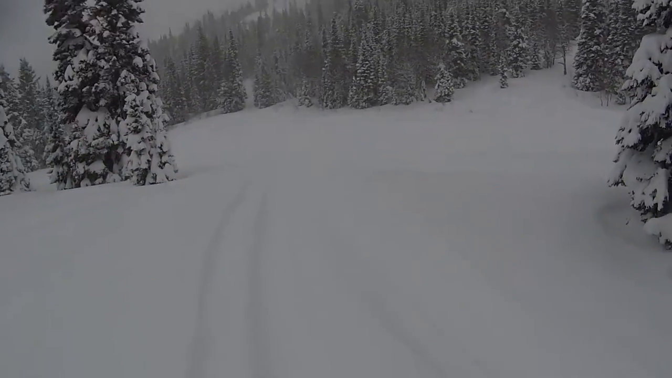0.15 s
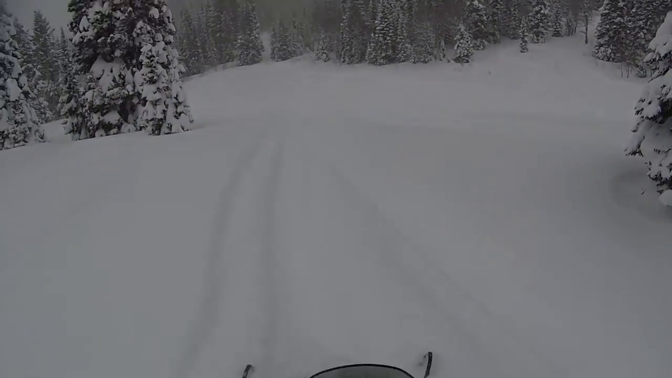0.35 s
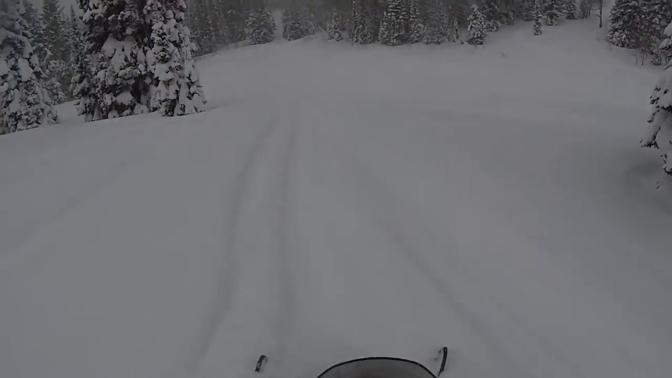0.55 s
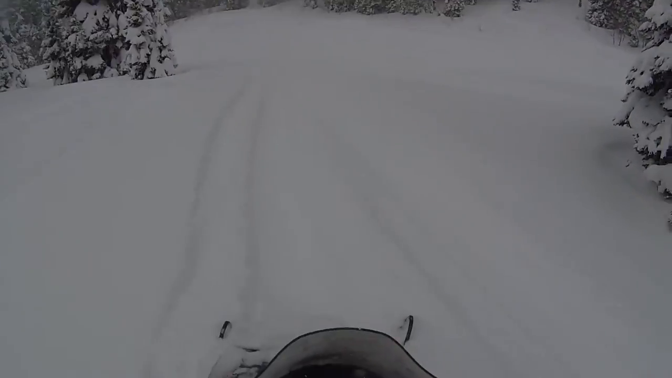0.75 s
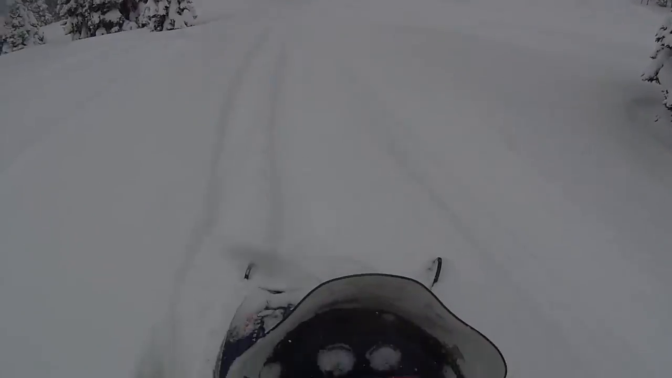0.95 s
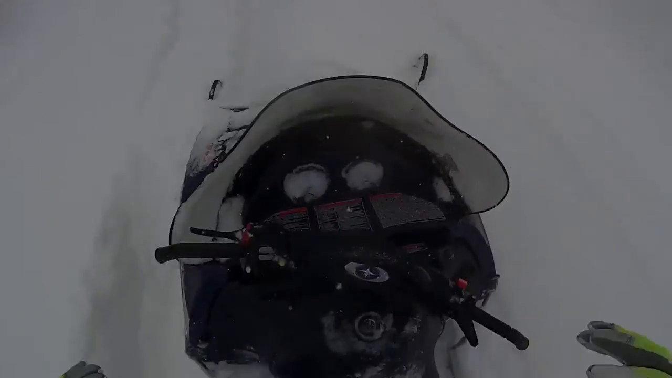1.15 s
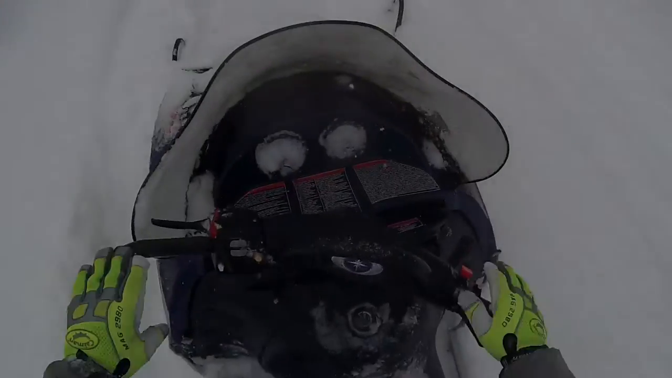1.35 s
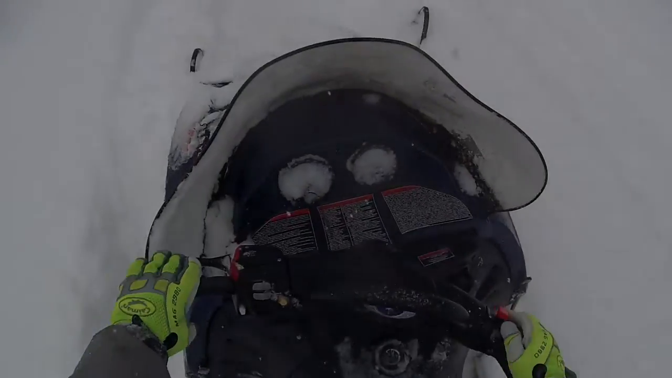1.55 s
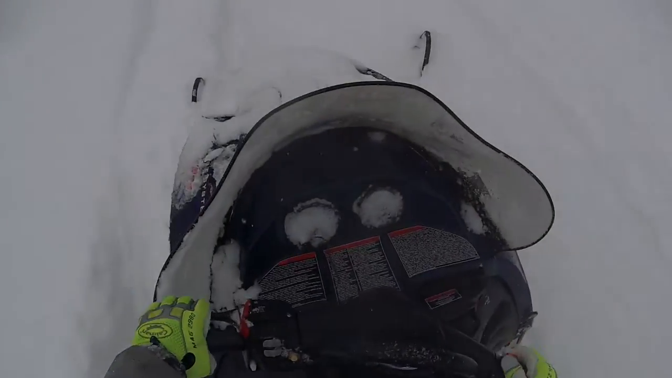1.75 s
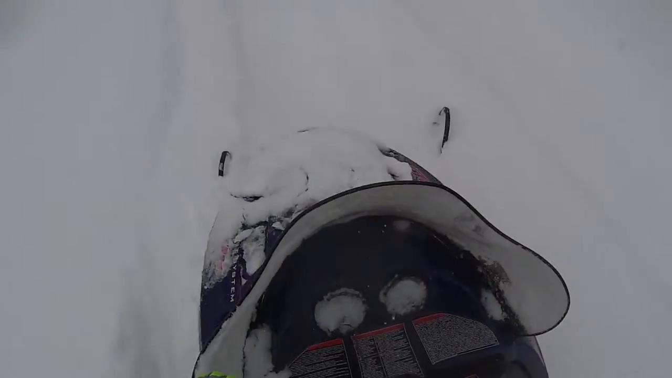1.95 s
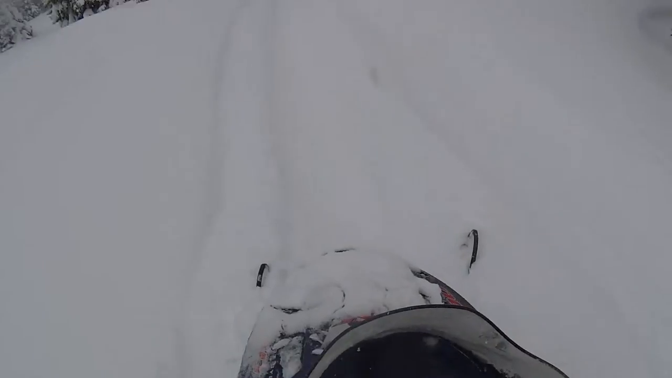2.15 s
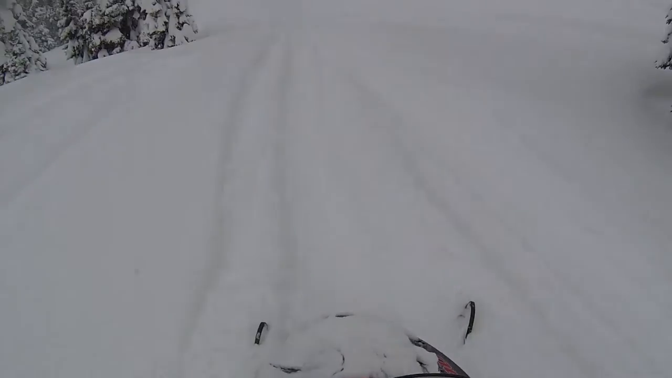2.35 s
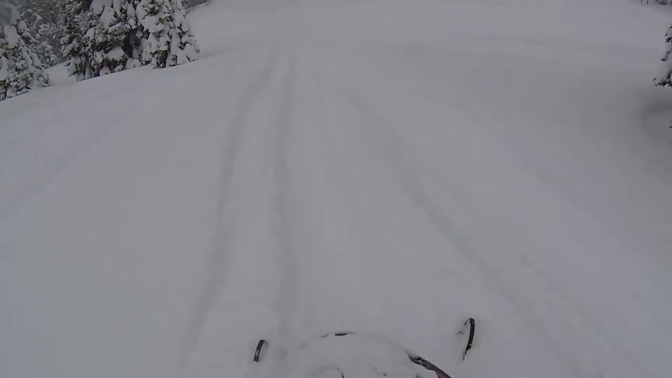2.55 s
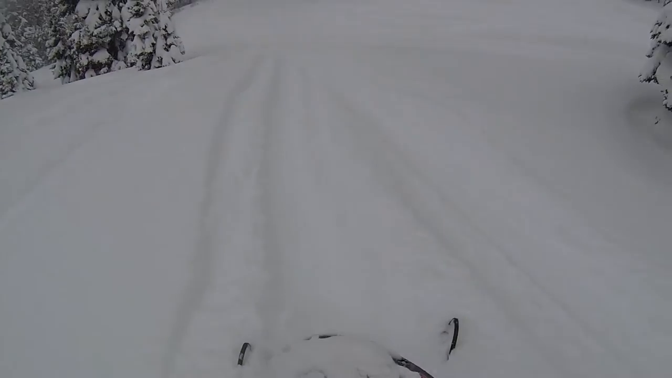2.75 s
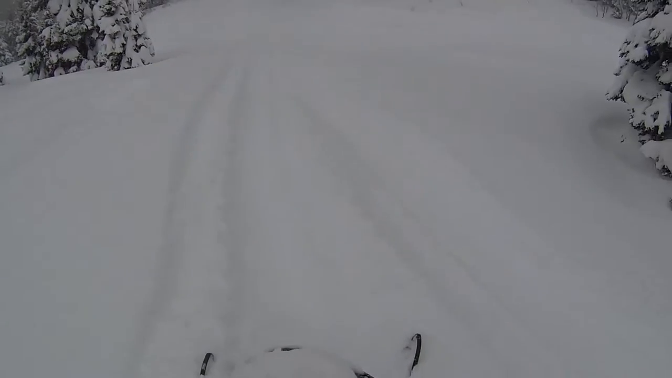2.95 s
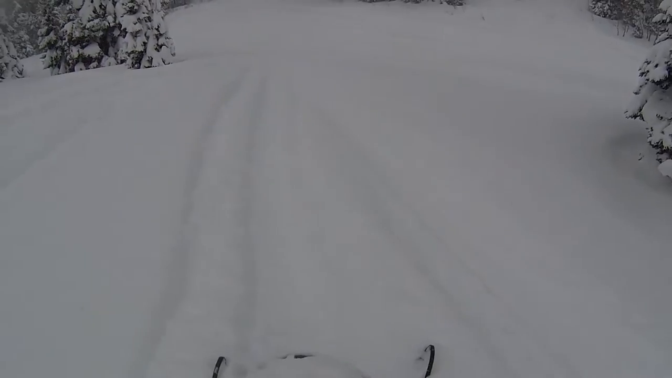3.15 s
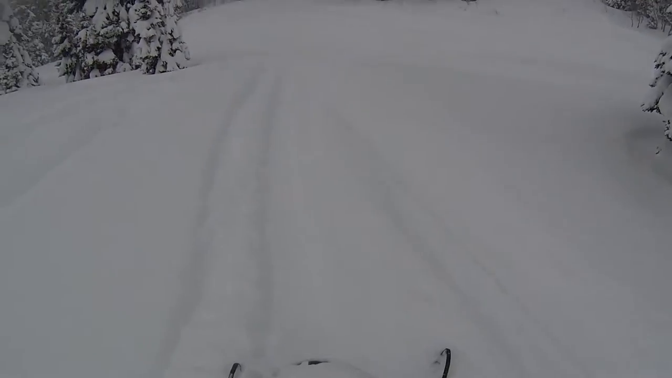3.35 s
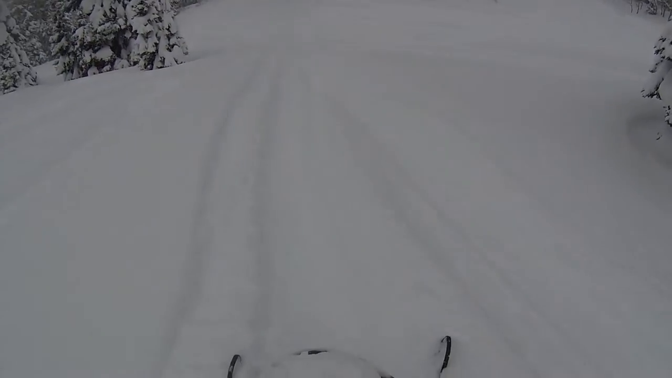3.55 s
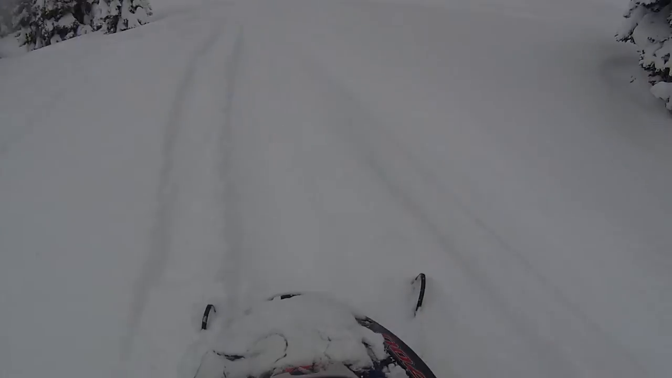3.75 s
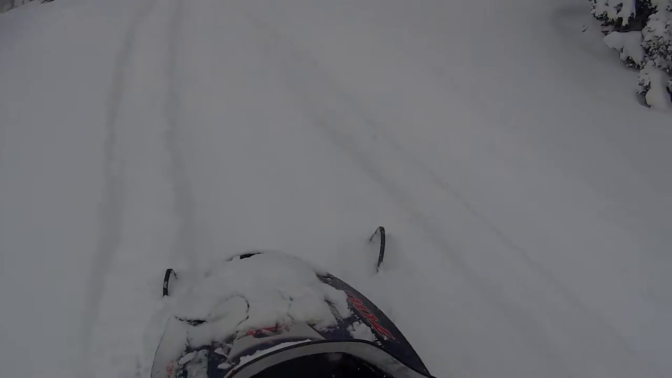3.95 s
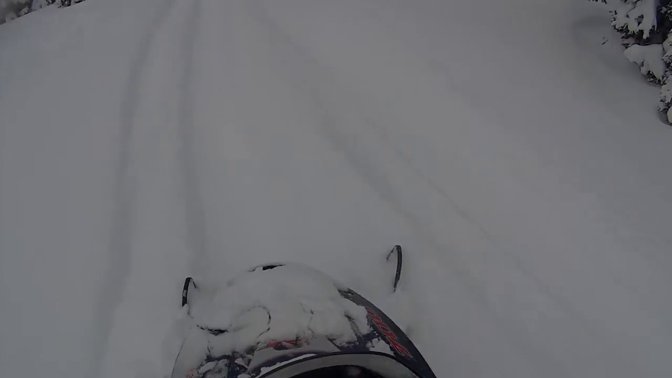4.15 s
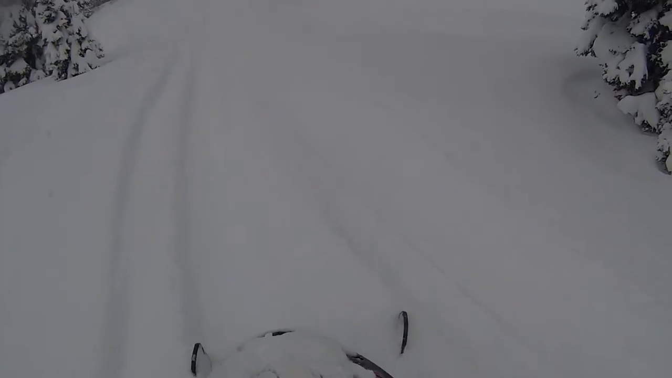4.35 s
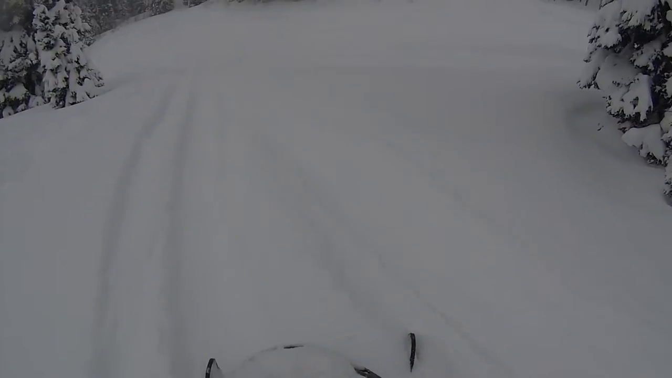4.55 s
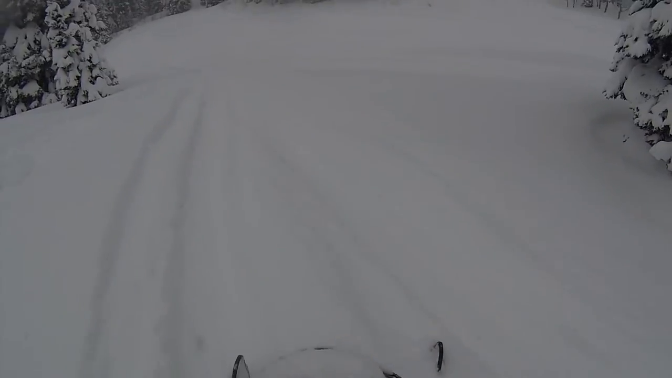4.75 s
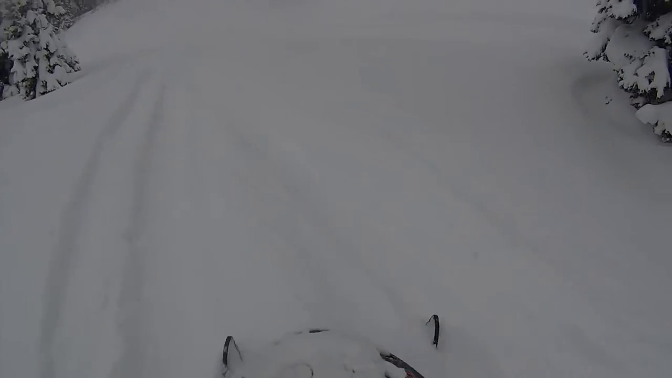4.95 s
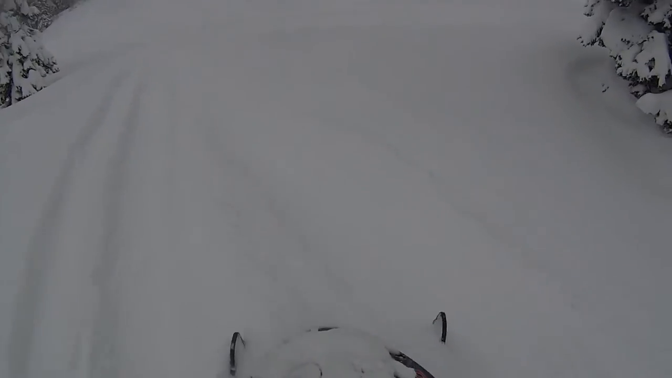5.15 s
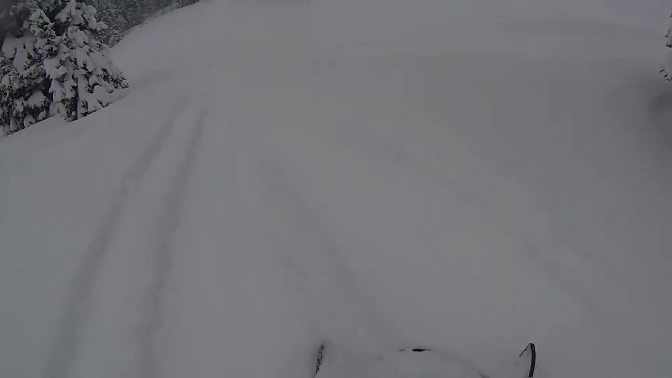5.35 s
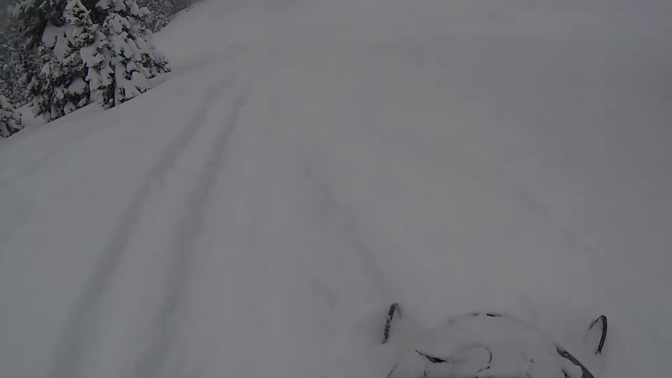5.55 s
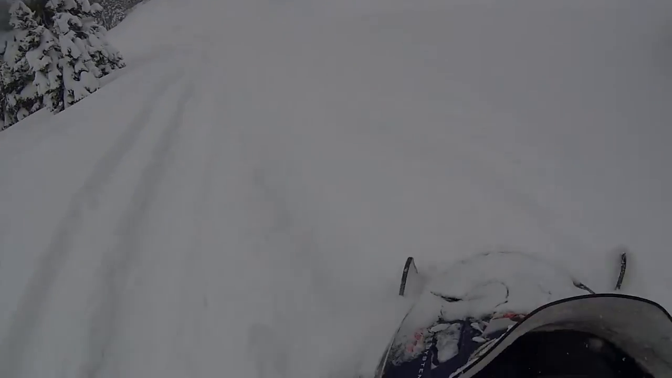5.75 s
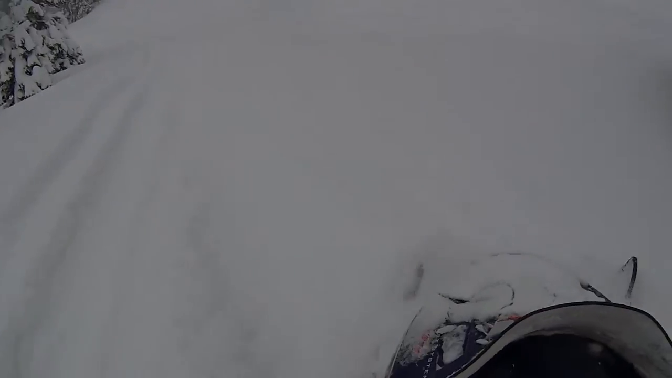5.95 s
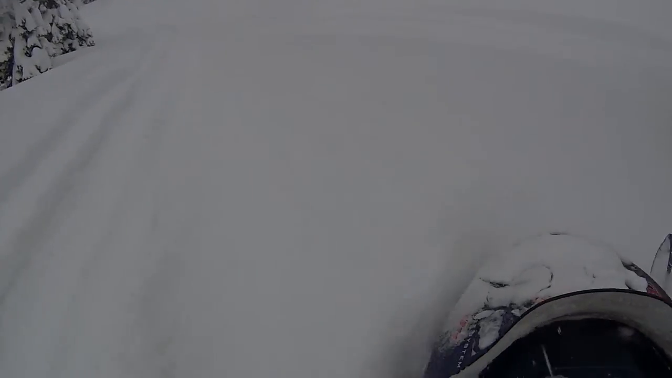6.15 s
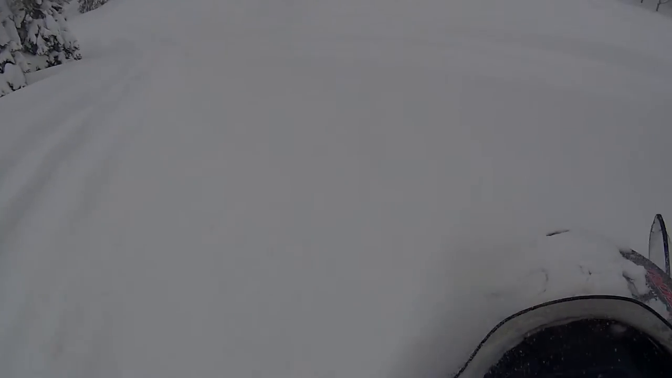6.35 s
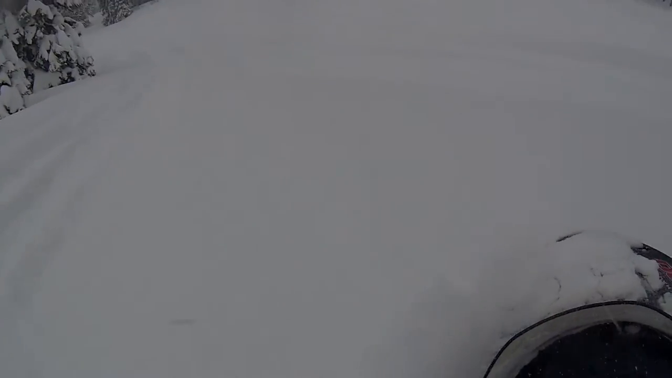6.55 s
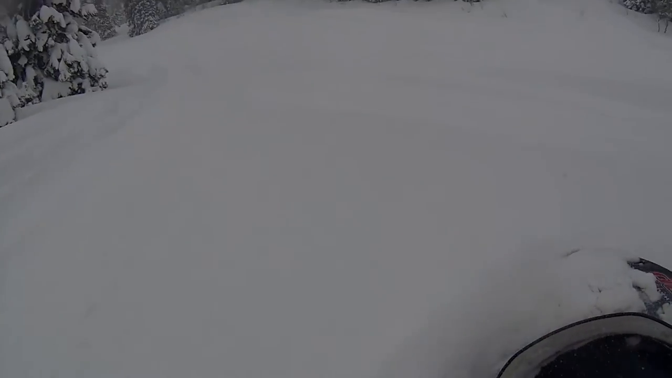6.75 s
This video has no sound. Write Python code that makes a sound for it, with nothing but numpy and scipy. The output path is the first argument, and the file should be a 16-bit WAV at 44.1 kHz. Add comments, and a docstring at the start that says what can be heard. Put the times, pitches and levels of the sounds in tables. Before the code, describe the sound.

Muffled handling bumps and scrapes over a quiet idling two-stroke snowmobile; it picks up, cruises unevenly, then surges into a strong, high buzzing roar.

```python
"""Snowmobile in powder

A two-cylinder two-stroke idles, picks up, cruises and opens up: crank-order tones, exhaust beats and hiss.
The microphone sits in a sealed helmet-camera case whose modes, as a filter, colour exhaust, rubs and knocks.
The mount swells at a low pitch; the case is rubbed and knocked while the rider moves his head.
Track hum, exhaust pops, a glove squeak, faint treble ticks, microphone noise and a faint whine complete it."""
import sys
import numpy as np
from scipy import signal
from scipy.fft import rfft, irfft
from scipy.io import wavfile
from scipy.ndimage import uniform_filter1d

SR = 44100
rng = np.random.default_rng(int(sys.argv[2]) if len(sys.argv) > 2 else 0)


def unload_wav(signal):
    """Save mono or channel-first audio to the path in sys.argv[1] as 16-bit WAV at rate SR, clipped to [-1, 1]."""
    wavfile.write(
        sys.argv[1],
        SR,
        np.round(np.clip(np.atleast_2d(signal).T, -1, 1) * 32767).astype(np.int16),
    )


N = 304290
SPLIT_HZ = 2900  # exhaust beats below, intake hiss above; also the foot of the rubbing treble


def amp(db):
    """Amplitude ratio of a level in dB."""
    return 10 ** (np.asarray(db) / 20)


def unit_rms(x):
    """Scale to rms 1."""
    return x / np.sqrt(np.mean(x ** 2) + 1e-20)


def columns(table):
    """Each column after the time, interpolated at every sample."""
    t_s, *rest = np.transpose(table)
    return [np.interp(np.arange(N) / SR, t_s, column) for column in rest]


def drift(rate_hz):
    """Slow random curve of rms 1, changing about rate_hz times a second."""
    size = max(int(SR / rate_hz), 2)
    smooth = uniform_filter1d(rng.standard_normal(N), size)
    return unit_rms(uniform_filter1d(smooth, size))


def shaped_noise(points):
    """Noise of rms 1 with a spectrum drawn through (f/Hz, level/dB)."""
    f, db = np.transpose(points)
    hz = np.fft.rfftfreq(N, 1 / SR)
    gain = amp(np.interp(np.log(hz + 1), np.log(f + 1), db))
    return unit_rms(irfft(rfft(rng.standard_normal(N)) * gain, N))


def butter(x, order, cutoff_hz, kind="low"):
    """Butterworth filter."""
    return signal.sosfilt(signal.butter(order, cutoff_hz, kind, fs=SR, output="sos"), x)


def case(column):
    """Minimum-phase response of the case, energy 1: steep-sided modes summed in power."""
    # case modes: f/Hz, width/Hz, then relative level/dB at light throttle, full throttle, struck, rubbed
    modes = [(122, 150, -42, -20, -28, -9), (200, 150, -24, -21.5, -45, -31),
             (353, 330, -31.5, -23, -29.5, -40), (486, 40, -62, -44, -18, -5.5),
             (677, 145, -24.5, -26, -35, -19), (840, 88, -21.5, -22.5, -34, -28),
             (1262, 47, -63, -19.5, -21, -6), (1418, 66, -9.5, -0.5, -6, 2),
             (1476.3, 57.5, 4.5, 2, -4, -18), (1588.5, 160, -4, 0.5, 3.5, 6),
             (1774, 220, -15, -6.5, -14, -5.5), (1955, 99, -15, -16.5, -5.5, 1.5),
             (2128, 140, -8, -33, -12, 1.5), (2283, 397, -20, -11.5, -6.5, -0.5),
             (2528, 79, -20, -10.5, -10.5, -6.5), (2712, 177, -27, -18, -42, -16),
             (3400, 596, -25, -37, -40, -14.5), (3540, 990, -49.5, -25, -26, -18),
             (4560, 287, -28.5, -27.5, -38, -26), (4946, 710, -41, -30, -41, -19),
             (5660, 1400, -53.5, -36.5, -36, -43), (6715, 940, -42.5, -33, -31, -27.5),
             (8250, 2260, -54.5, -46, -49, -42.5), (10240, 580, -71, -48, -62, -54),
             (11000, 400, -67, -48, -62, -51), (12200, 1400, -78, -56.5, -66, -58),
             (13600, 1700, -87, -62.5, -68, -63)]
    hz = abs(np.fft.fftfreq(8192, 1 / SR))
    power = sum(amp(m[column]) ** 2 / (1 + (2 * (hz - m[0]) / m[1]) ** 2) ** 2 for m in modes)
    log_gain = np.log(power + 1e-10) / 2
    taps = np.fft.ifft(np.exp(np.conj(signal.hilbert(log_gain)))).real[:4096]
    return taps / np.linalg.norm(taps)


def engine():
    """Firing tone and low crank orders direct; exhaust beats and intake hiss through the case."""
    # firing: t/s, firing rate/Hz, firing tone level/dB
    speed = [(0, 56.7, -58), (1.95, 57.5, -58), (2.06, 60.4, -47.5), (2.36, 81.4, -50), (2.45, 105.2, -47),
             (2.54, 130.5, -53.5), (2.62, 133.3, -78), (2.72, 126.3, -67), (2.78, 127.3, -56.5),
             (3.1, 146.1, -55.5), (3.46, 140.3, -55.5), (3.65, 151.7, -47.5), (3.79, 137.1, -71),
             (3.84, 137.2, -51), (3.9, 141.3, -50.5), (4.0, 158.4, -52), (4.07, 161.6, -50.5),
             (4.19, 142, -62), (4.41, 126.1, -58), (4.56, 125.2, -50), (4.64, 129.3, -54),
             (5.11, 136.5, -55), (5.35, 137.3, -53), (5.63, 181.8, -46.5), (5.78, 199.4, -39),
             (6.0, 228.8, -36.5), (6.25, 233.6, -35.5), (6.5, 227.6, -37.5), (6.9, 218.7, -35.5)]
    # gas flow: t/s, exhaust level/dB, intake hiss level/dB
    load = [(0, -48.5, -62), (1.1, -52.5, -66.5), (2.0, -53.5, -66.5), (2.33, -53.5, -67),
            (2.38, -45.5, -57), (2.52, -39, -52), (2.57, -38, -47.5), (2.66, -40.5, -53), (2.9, -40, -52),
            (3.04, -35.5, -48), (3.12, -39, -53), (3.4, -37, -52), (3.53, -34, -53), (3.74, -36, -51),
            (3.86, -37, -53), (4.0, -33.5, -47.5), (4.08, -35.5, -50.5), (4.14, -35, -52.5),
            (4.5, -39, -56), (5.0, -37.5, -52.5), (5.15, -40, -53.5), (5.4, -36, -54), (5.69, -27.5, -46.5),
            (5.88, -23, -44.5), (5.98, -23.5, -43.5), (6.02, -26, -41.5), (6.32, -25.5, -43),
            (6.8, -20, -42.5), (6.9, -19.5, -42)]
    # rider: t/s, throttle/0-1, roughness/0-1 (noise share of exhaust power)
    rider = [(0, .3, .9), (2.3, .3, .85), (2.45, 0, .65), (5.3, .05, .68), (5.6, .6, .5), (5.75, .9, .28),
             (6, 1, .27), (6.5, 1, .38), (6.9, 1, .22)]
    # low crank orders: multiple of crank speed, base level/dB re third harmonic of the firing tone
    crank = [(1, -7.5), (3, -11), (5, -8.5), (7, -12.5), (8, -7.5), (9, -15.5), (10, -17), (12, -10.5)]
    # high crank orders that stand out or sit back: multiple of crank speed: gain/dB
    order_lift_db = {15: 3.6, 19: 3.8, 12: -2}
    # upper against lower exhaust note: t/s, gain/dB
    rasp = [(0, -2), (1, -7.5), (2.2, -4), (2.5, 1.5), (3.2, 1.5), (3.5, -12.5), (4, -9.5), (4.5, -2.5),
            (6.3, -1), (6.6, -13), (6.9, -18)]
    # firing-tone harmonics re the held tone: level/dB at light throttle, at full throttle
    second_range_db = (-13, -30)
    third_range_db = (-16.5, -18.5)
    harmonic_floor_db = -55  # harmonics do not follow the tone below this
    climb_db, climb_full_per_s = 7, 2.6  # harmonics swell while revs climb; full gain at this relative rise
    surge_db, surge_hz = .5, 30.8  # uneven firing off the throttle
    phase_spread_rad = .9  # high orders partly line up into one beat per crank turn
    intake_wall_db = 19.5  # intake level before the case wall over that after it
    rasp_hz = 1950

    firing_hz, tone_db = columns(speed)
    level_db, hiss_db = columns(load)
    throttle, rough = columns(rider)
    fires = np.cumsum(firing_hz) / SR  # two per crank turn

    climb_per_s = uniform_filter1d(np.gradient(np.log(firing_hz)) * SR, size=2000)
    held_db = np.maximum(tone_db, harmonic_floor_db)
    held_db = held_db + climb_db * np.clip(climb_per_s / climb_full_per_s, 0, 1)
    second_db, third_db = (held_db + light + (full - light) * throttle + 2.64 * drift(5.7)
                           for light, full in (second_range_db, third_range_db))
    tone_db = tone_db + 1.02 * (1 - throttle) * drift(20)
    low = sum(amp(db) * np.cos(2 * np.pi * k * fires)
              for k, db in enumerate((tone_db, second_db, third_db), 1))
    for k, db in crank:
        odd_db = -8.6 * (.5 - throttle) * (k % 2) * (k > 1)  # odd orders above 1 grow with throttle
        order_db = third_db + db + odd_db + 3.2 * drift(3.3)
        low += amp(order_db) * np.cos(np.pi * k * fires + 2 * np.pi * rng.random())

    beats = np.zeros(N)
    for k in range(11, 44):  # each order waxes and wanes on its own
        gain = amp(order_lift_db.get(k, 0) + 3.5 * drift(5))
        phase = .22 * drift(25) + phase_spread_rad * rng.standard_normal()
        beats += gain * np.cos(np.pi * k * fires + phase)
    beats *= np.sqrt(firing_hz / SR)  # even power per Hz as the orders spread out

    # gas noise is strongest just after each firing, more so after every second one
    puffs = .5 + np.exp(-(fires % 1) / .5) + 1.2 * np.exp(-(fires % 2) / .75)
    gas = puffs * amp(1.42 * drift(23.4)) * rng.standard_normal(N)
    level_db = level_db + surge_db * (1 - 1.12 * throttle) * drift(surge_hz)
    exhaust = amp(level_db) * (np.sqrt(1 - rough) * beats + np.sqrt(rough) * unit_rms(gas))
    upper = butter(exhaust, 4, rasp_hz, "high")
    exhaust = butter(exhaust, 4, rasp_hz) + amp(columns(rasp)[0]) * upper
    intake = amp(hiss_db + intake_wall_db + drift(54)) * rng.standard_normal(N)

    drive = butter(exhaust, 4, SPLIT_HZ) + butter(intake, 4, SPLIT_HZ, "high")
    light = signal.oaconvolve(drive * np.sqrt(1 - throttle), case(column=2))
    full = signal.oaconvolve(drive * np.sqrt(throttle), case(column=3))
    return np.sqrt(2) * low + (light + full)[:N]


def swell(peak_s, rise_s, t60_s):
    """Envelope: smooth rise to 1 at peak_s, then exponential decay."""
    t = np.arange(N) / SR - peak_s
    rise = np.cos(np.pi / 2 * np.clip(-t / rise_s, 0, 1)) ** 2
    return np.where(t < 0, rise, amp(-60 * np.maximum(t, 0) / t60_s))


def mount():
    """Low-pitched swells of the mount, some with a broad shudder, over a sway that never quite settles."""
    # swells: peak t/s, tone level/dB, tone f/Hz, tone t60/s, shudder level/dB
    swells = [(0.017, -34, 40.6, 0.28, -37.5), (0.071, -29, 47.2, 0.22, -32.5),
              (0.13, -27, 35.2, 0.13, -57), (0.17, -22, 43.5, 0.57, -47), (0.381, -22, 44.3, 0.36, -63),
              (0.55, -31.5, 45.63, 1.05, -54), (0.75, -29.5, 41.76, 0.54, -59),
              (0.83, -19.5, 41.6, 0.39, -39), (0.98, -31, 43.73, 0.35, -67), (1.19, -47, 46, .3, -69),
              (1.84, -43.5, 34.3, 0.81, -74), (2.19, -48, 35.2, 0.56, -58), (2.44, -38, 41.66, 0.4, -66),
              (2.67, -52, 44.58, 0.63, -62), (3.501, -35.5, 42, 0.85, -47), (3.79, -52, 44.83, .5, -49),
              (3.96, -45, 43.5, 0.39, -62), (4.23, -41.5, 43.97, 0.61, -62), (5.07, -46, 43.5, .4, -60),
              (5.25, -41, 43.86, 1.86, -54), (5.61, -37.5, 43.7, 1.95, -62),
              (5.94, -35.5, 44.91, 1.04, -70), (6.19, -40.5, 43.94, 1.1, -72),
              (6.34, -39.5, 43.57, 1.5, -70), (6.51, -40, 42.8, 0.3, -70), (6.69, -37.5, 34.5, 0.73, -68),
              (6.9, -38, 46.6, .5, -70)]
    # steady shudder: t/s, level/dB
    rumble = [(0, -50), (.72, -49), (1.0, -55.5), (2.0, -57), (2.7, -61.5), (2.85, -54.5), (5.4, -59),
              (5.62, -66)]
    # shudder spectrum: f/Hz, relative density/dB
    shudder_spectrum = [(12, -44), (20, 11.5), (54, 2.5), (119, -3.5), (136, -10), (232, -16), (252, -17),
                        (565, -24), (1200, -30), (1560, -61), (2640, -120)]
    tone_rise_s, shudder_rise_s, shudder_t60_s = .039, .041, .14
    sway_hz, sway_db = 42, -58.5
    shudder_wide_db = 8  # whole shudder over its audible band

    peak_s, tone_db, tone_hz, tone_t60_s, shudder_db = np.transpose(swells)
    tone_level = np.sqrt(sum((amp(db) * swell(at, tone_rise_s, t60)) ** 2
                             for at, db, t60 in zip(peak_s, tone_db, tone_t60_s)))
    brief_level = np.sqrt(sum((amp(db) * swell(at, shudder_rise_s, shudder_t60_s)) ** 2
                              for at, db in zip(peak_s, shudder_db)))
    turns = np.cumsum(np.interp(np.arange(N) / SR, peak_s, tone_hz)) / SR
    sway_turns = np.cumsum(sway_hz + 2.8 * drift(5.9)) / SR
    sway = amp(sway_db + 5.5 * drift(8)) * np.cos(2 * np.pi * sway_turns)
    shudder_level = np.hypot(brief_level, amp(columns(rumble)[0] + 2 * drift(15)))
    tones = np.sqrt(2) * (tone_level * np.cos(2 * np.pi * turns) + sway)
    return tones + amp(shudder_wide_db) * shudder_level * shaped_noise(shudder_spectrum)


def strokes():
    """Rubbing gain in the middle, treble and hollow bands; strokes add in power."""
    # strokes across the case: start t/s, rise/s, fall/s, peak level/dB, extra treble/dB, extra hollow ring/dB
    rubs = [(0.0, 0.0036, 0.16, -37.5, -11, -2), (0.046, 0.011, 0.045, -28.5, -6, -2),
            (0.08, 0.023, 0.03, -36, 7.5, 8), (0.17, 0.098, 0.016, -34, -7.5, 0.5),
            (0.28, 0.012, 0.035, -44, -6, 4), (0.325, 0.033, 0.1, -41, 2, 3),
            (0.455, 0.067, 0.072, -36.5, 0.5, -2.5), (0.52, 0.052, 0.059, -40.5, -3, -1),
            (0.61, 0.021, 0.048, -36.5, -0.5, 1), (0.66, 0.047, 0.038, -38, -6, 9),
            (0.785, 0.022, 0.073, -39.5, 4, 6.5), (0.884, 0.0064, .012, -35.5, -1, 10.5),
            (0.92, 0.05, .03, -61, -4, 1)]
    depth_db = 14.5  # a stroke swells and fades through this range
    t, power = np.arange(N) / SR, np.zeros((3, N))
    for start, rise, fall, db, treble_db, hollow_db in rubs:
        shape = np.interp(t, (start, start + rise, start + rise + fall), (-1, 0, -1), -4, -4)
        bands_db = np.array([[0], [treble_db], [hollow_db]])
        power += amp(db + depth_db * shape + bands_db) ** 2
    return uniform_filter1d(np.sqrt(power), size=100)


def rubbing():
    """Fine random grains, gated by the strokes in three bands, ring the case."""
    hollow_hz = 1050  # the hollow ring of the case lies below
    middle_gain, treble_gain, hollow_gain = strokes()
    sizes = amp(2.54 * np.minimum(rng.exponential(1, N), 4))
    hits = rng.random(N) < 3500 / SR  # grains per second
    grains = sizes * hits * rng.standard_normal(N)
    rub = amp(1.6 * drift(76)) * unit_rms(grains)
    hollow = hollow_gain * butter(rub, 4, hollow_hz)
    middle = middle_gain * butter(rub, 4, (hollow_hz, SPLIT_HZ), "band")
    treble = treble_gain * butter(rub, 4, SPLIT_HZ, "high")
    return signal.oaconvolve(hollow + middle + treble, case(column=5))[:N]


def knocks():
    """Short blows with some chatter ring the case; a longer contact is duller."""
    # knocks: t/s, peak level/dB, nominal contact/ms (limited below)
    blow_table = [(0.019, -26, 0.35), (0.0551, -19, 0.14), (0.0744, -28, 0.68), (0.205, -34, 0.67),
                  (0.266, -44, 0.72), (0.492, -26, 0.2), (0.5832, -24.5, 0.42), (0.6264, -30, 0.42),
                  (0.7926, -28, 0.26), (0.8104, -17.5, 0.41), (0.82, -43, 0.25), (0.839, -30.5, 0.65),
                  (0.891, -16, 0.16), (0.921, -34, 0.43), (1.283, -17, 0.39), (1.4244, -36, 0.35),
                  (1.9033, -31, 0.47), (2.043, -37, 0.23), (2.1676, -33.5, 0.3), (5.1652, -19, 0.32)]
    ring, t, blows = case(column=4), np.arange(200) / SR, np.zeros(N)
    chatter = rng.standard_normal((len(blow_table), 200))
    for (at_s, db, contact_ms), noise in zip(blow_table, chatter):
        touch = signal.windows.hann(int(np.clip(contact_ms, .05, .6) * SR / 1000) + 3)
        impact = np.exp(-t / .0016) * (.19 * noise + (t == 0))
        knock = np.convolve(impact, touch)[:200]
        blows[round(at_s * SR):][:200] += amp(db) * knock / abs(np.convolve(knock, ring)).max()
    return signal.oaconvolve(blows, ring)[:N]


def ticks():
    """Sparse, tiny, bright noise ticks in the treble."""
    ticks_per_s, base_db, highpass_hz, decay_s = 25, -63.5, 7000, .00089
    sizes = amp(base_db + 3.62 * np.minimum(rng.exponential(1, N), 3))
    hits = sizes * (rng.random(N) < ticks_per_s / SR)
    decay = np.exp(-np.arange(200) / SR / decay_s)
    bursts = signal.oaconvolve(hits, decay)[:N] * rng.standard_normal(N)
    return butter(bursts, 2, highpass_hz, "high")


def squeak():
    """A slip of the glove on the case: one brief high sine under a sin^2 envelope."""
    # slip: t/s, f/Hz, peak level/dB, length/s
    at_s, hz, db, length_s = (.834, 3800, -40, .012)
    u = np.clip((np.arange(N) / SR - at_s) / length_s, 0, 1)
    return amp(db) * np.sin(np.pi * u) ** 2 * np.sin(2 * np.pi * hz * length_s * u)


def pops():
    """Single hard firings: short soft bursts of the exhaust note ring the case."""
    # hard firings: t/s, peak level/dB
    firings = [(2.7088, -29), (3.4117, -34), (3.4414, -23.5), (3.5744, -23), (3.7683, -24), (3.875, -32),
               (3.9925, -27), (4.0775, -27), (5.1171, -33), (5.2445, -33.5), (5.6094, -27), (5.676, -16),
               (5.7364, -12), (6.539, -17)]
    centre_hz, length_s = 1535, .0077
    ring, t, out = case(column=2), np.arange(round(length_s * SR)) / SR, np.zeros(N)
    envelope = np.sin(np.pi * (t / length_s) ** .6) ** 2
    for (at_s, db), (phase_rad, detune) in zip(firings, rng.random((len(firings), 2))):
        hz = centre_hz * (.95 + .1 * detune)
        burst = envelope * np.cos(2 * np.pi * hz * t + 2 * np.pi * phase_rad)
        out[round(at_s * SR):][:len(t)] += amp(db) * burst / abs(np.convolve(burst, ring)).max()
    return signal.oaconvolve(out, ring)[:N]


def track():
    """Drive track lugs passing their sprocket: a hum of wavering level at the lug rate."""
    # lugs: t/s, lug rate/Hz, level/dB
    lugs = [(4.45, 77.5, -73), (4.6, 80.5, -49), (4.89, 81.68, -54.5), (5.26, 83.47, -49),
            (5.4, 82.93, -68), (5.62, 82.13, -54.5), (5.82, 126.4, -50), (6.09, 170, -51), (6.25, 199, -51),
            (6.4, 204.8, -47)]
    hz, db = columns(lugs)
    t, fade_s = np.arange(N) / SR, .02
    to_edge_s = np.minimum(t - lugs[0][0], lugs[-1][0] - t)
    gate = np.clip((to_edge_s + fade_s) / fade_s, 0, 1)  # open from first row to last
    hum = np.cos(2 * np.pi * np.cumsum(hz) / SR)
    return np.sqrt(2) * gate * amp(db + 3.5 * drift(8)) * hum


def scene():
    """Sum of all sources, one channel."""
    handling = rubbing() + knocks() + squeak()
    return (engine() + mount() + handling + ticks() + pops() + track())[None]


def record(dry):
    """Add flickering microphone noise and a faint whine of the camera electronics, then band-limit."""
    # microphone noise spectrum: f/Hz, relative density/dB
    hiss = [(1500, 5), (3000, -31.5), (6000, -7.5), (9000, -8), (12000, -7.5), (13500, -10), (15500, -10)]
    # whine: harmonic number, level/dB
    whine_harmonics = [(1, -74.5), (2, -83), (3, -83.5), (4, -85.5), (5, -100)]
    hiss_db, whine_hz, edge_hz = -70, 2840, 15250
    turns = np.cumsum(whine_hz + 17 * drift(38)) / SR
    whine = sum(amp(db + 1.9 * drift(2.4) + 5.1 * drift(150)) * np.cos(2 * np.pi * k * turns)
                for k, db in whine_harmonics)
    noisy = dry + whine + amp(hiss_db + 2 * drift(60)) * shaped_noise(hiss)
    lowpass = signal.firwin(511, edge_hz, window=("kaiser", 9), fs=SR)
    return signal.oaconvolve(noisy, lowpass[None], "same")


dry = scene()
out = record(dry)
unload_wav(out)
```